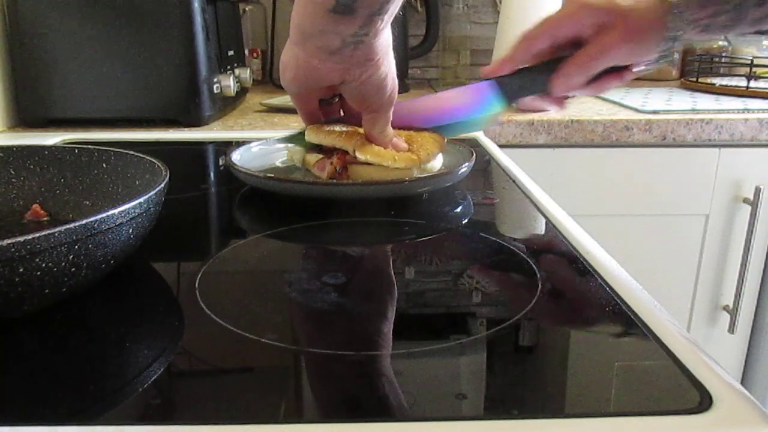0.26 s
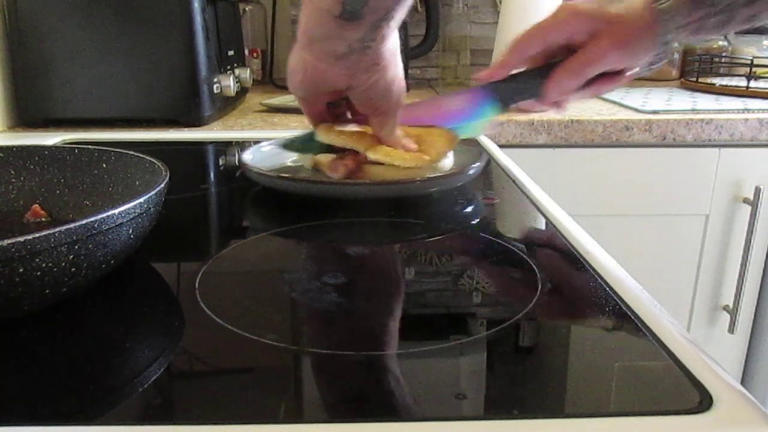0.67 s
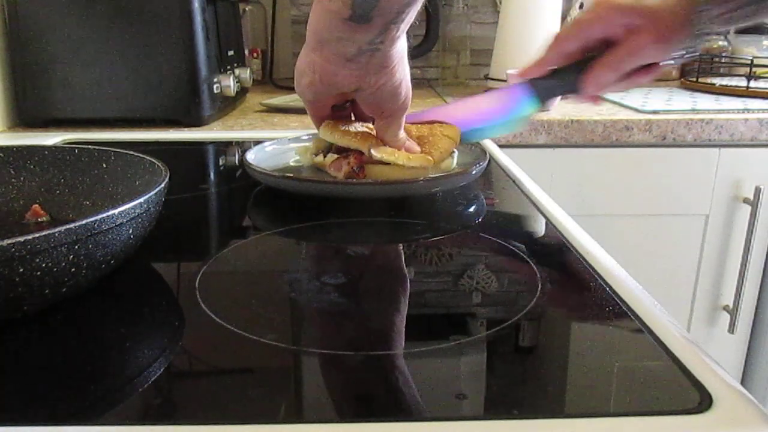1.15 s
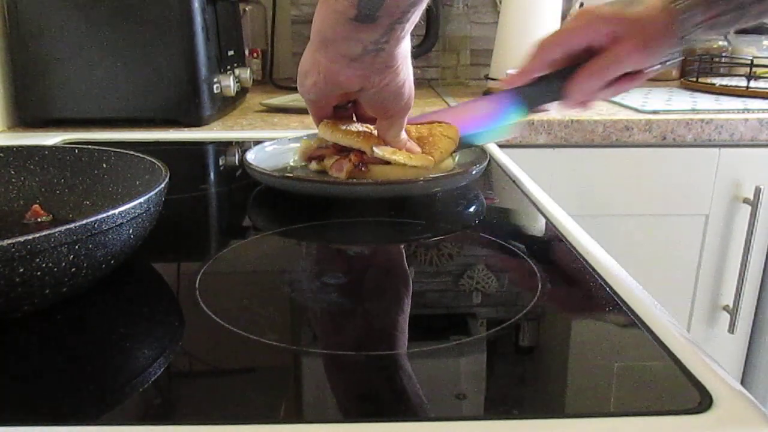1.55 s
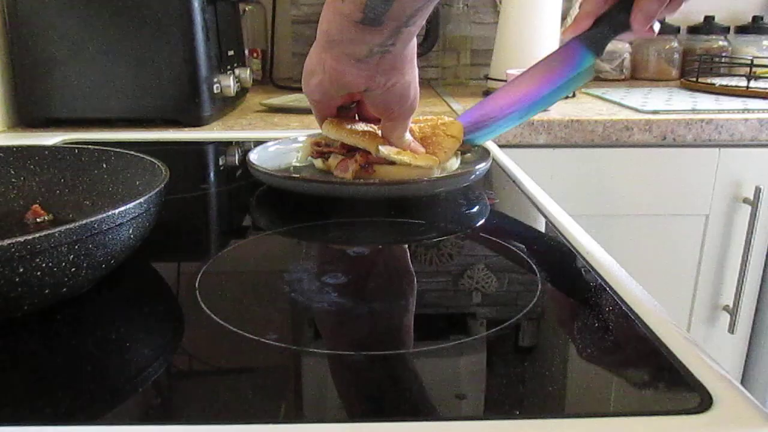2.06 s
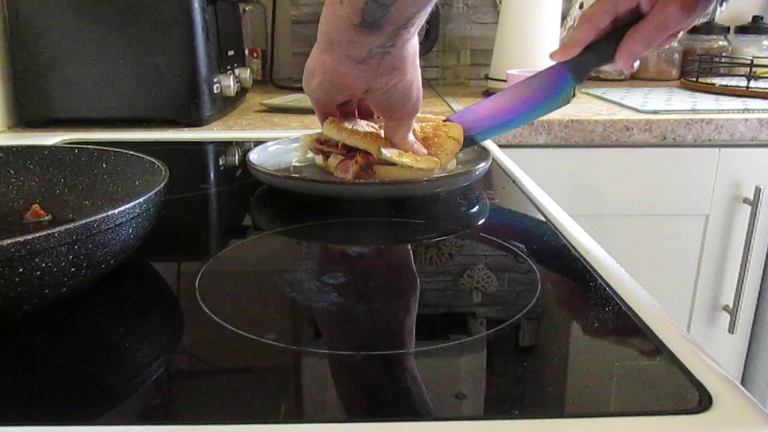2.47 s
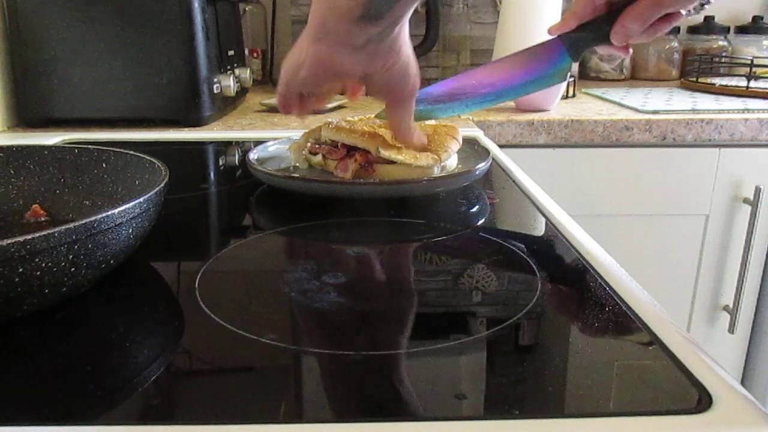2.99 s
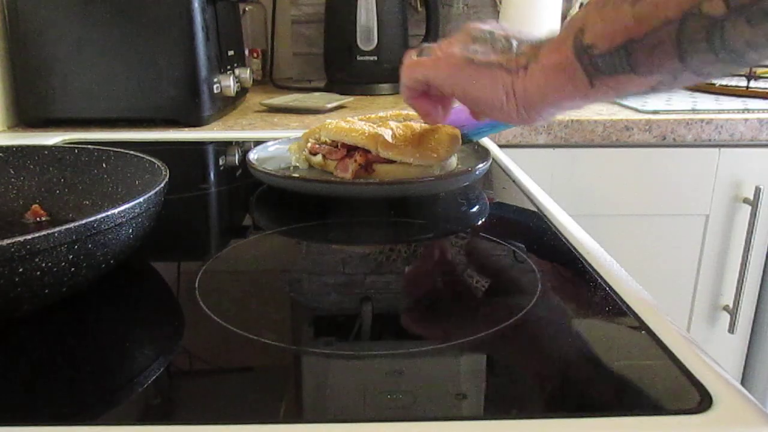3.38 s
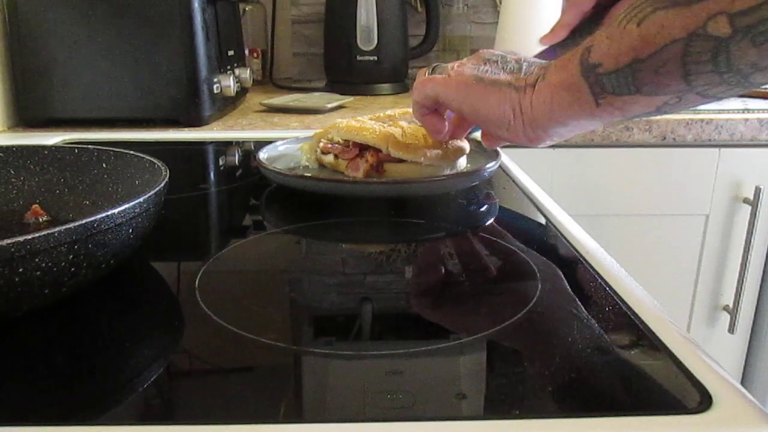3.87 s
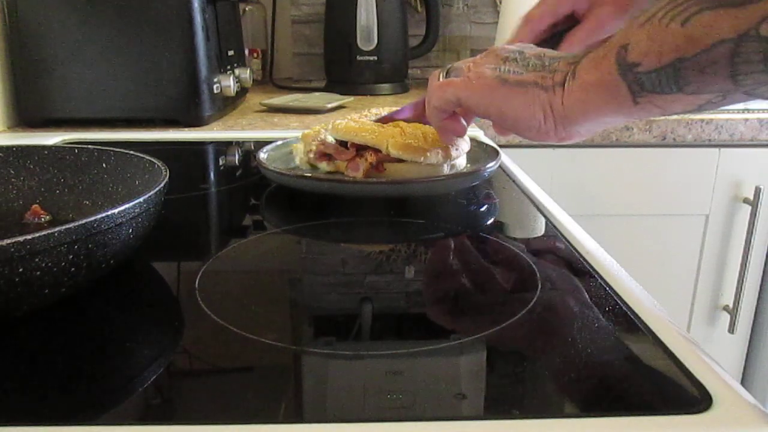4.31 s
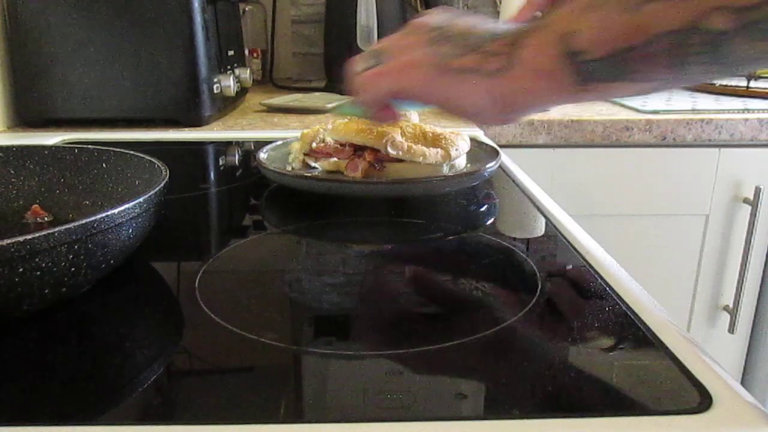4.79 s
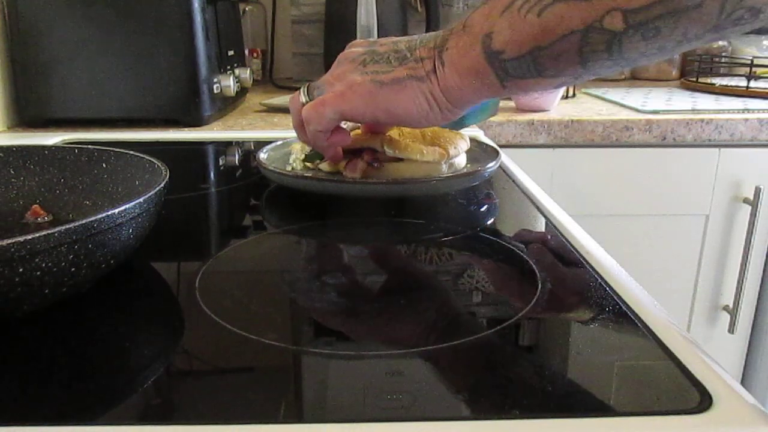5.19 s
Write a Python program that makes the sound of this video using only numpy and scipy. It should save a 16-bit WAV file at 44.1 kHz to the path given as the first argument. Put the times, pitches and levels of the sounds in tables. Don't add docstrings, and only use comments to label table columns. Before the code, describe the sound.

Crisp bread crust crackles under a sawing blade, followed by hard ceramic clacks, a plate rocking, and a final dry tear.

```python
import sys
import numpy as np
from scipy import signal
from scipy.fft import rfft, irfft, next_fast_len
from scipy.io import wavfile
from scipy.ndimage import uniform_filter1d

SR = 44100
rng = np.random.default_rng(int(sys.argv[2]) if len(sys.argv) > 2 else 0)


def invert_db(level):
    return 10 ** (np.asarray(level, dtype=float) / 20)


def unload_wav(signal):
    wavfile.write(
        sys.argv[1],
        SR,
        np.round(np.clip(np.atleast_2d(signal).T, -1, 1) * 32767).astype(np.int16),
    )


N = 240292


def evened(x):
    return x / np.sqrt(np.mean(x ** 2) + 1e-20)


def read(points, hz):
    f, value = np.transpose(points)
    return np.interp(np.log(hz + 1), np.log(f + 1), value)


def add(mix, start_s, sound):
    part = mix[..., round(start_s * SR):][..., :sound.shape[-1]]
    part += sound[..., :part.shape[-1]]


def causal(gain_db):
    log_gain = np.log(invert_db(np.concatenate([gain_db, gain_db[-2:0:-1]])))
    return np.fft.ifft(np.exp(np.conj(signal.hilbert(log_gain)))).real


def colouring(points, size):
    return causal(read(points, np.fft.rfftfreq(size, 1 / SR)))[:size // 2]


def gestures(table, column, edge, rise):
    middle_s, length_s, level_db = np.array(table)[:, [0, 1, column]].T[:, :, None]
    t = np.arange(0, N, 64) / SR
    half_s = 2.6 * length_s * np.where(t < middle_s, rise, 1 - rise) / 2
    arch = np.cos(np.pi / 2 * np.clip((t - middle_s) / half_s, -1, 1)).clip(0) ** edge
    power = ((invert_db(level_db) * arch) ** 2).sum(0)
    return np.interp(np.arange(N) / SR, t, np.sqrt(power))


def grit(per_s, spread_db):
    size = invert_db(spread_db * np.minimum(rng.exponential(1, N), 4))
    return size * rng.choice([-1., 1.], N) * (rng.random(N) < per_s / SR)


def ring(modes, colour_db=0., damping=0.99, swell_ms=0.12, size=SR // 4):
    pitch_hz, width_hz, level_db = np.transpose(modes)[:, :, None]
    t = np.arange(size) / SR
    sign = (-1.) ** np.arange(len(pitch_hz))[:, None]
    decay = np.exp(-np.pi * width_hz * damping * t)
    sines = sign * width_hz * decay * np.sin(2 * np.pi * pitch_hz * t)
    return (invert_db(level_db + colour_db) * sines).sum(0) * (1 - np.exp(-1000 * t / swell_ms))


def leaned(x, lean, lag_s):
    size = next_fast_len(N)
    hz = np.fft.rfftfreq(size, 1 / SR)
    half_db = read(lean, hz) / 2
    ports = np.array([invert_db(half_db) * np.exp(-2j * np.pi * hz * lag_s), invert_db(-half_db)])
    return irfft(rfft(x, size) * ports, size)[:, :N]


# pitch_hz, level_db per Hz
AIR_SPECTRUM = [(12, -46.5), (20, -7), (139, -8.5), (290, -10.5), (333, -14), (508, -8.5), (569, -14),
                (893, -11), (1320, -4.5), (1850, -23.5), (2750, -13.5), (3960, -21.5), (11500, -20.5),
                (13500, -29.5), (15700, -34), (16000, -50), (16600, -55)]
# pitch_hz, width_hz, level_db
CASING = [(687, 72, -5), (912.6, 86, 2), (1410, 104, -7.5), (2280, 150, -15)]
# pitch_hz, likeness (-1 to 1)
AIR_LIKENESS = [(60, 0.082), (180, -0.15), (550, -0.42), (1650, 0.05), (4970, -0.42), (15000, 0.29)]
# pitch_hz, left_minus_right_db
AIR_BALANCE = [(60, -1.0), (180, 0.5), (550, 11.0), (1650, 6.5), (4970, -2.5), (15000, -5.0)]


def air():
    frames, hz = N // 512 + 6, np.fft.rfftfreq(2048, 1 / SR)
    a, b, c, d, patches = rng.standard_normal((frames, 1025, 5)).T
    patches = evened(uniform_filter1d(uniform_filter1d(patches, 20, 0), 8, 1))
    casing = sum(invert_db(2 * level_db) / (1 + (2 * (hz - pitch_hz) / width_hz) ** 2) ** 2
                 for pitch_hz, width_hz, level_db in CASING)
    level = np.sqrt(invert_db(2 * read(AIR_SPECTRUM, hz) - 3.5) + invert_db(-1.0) * casing)
    same = np.clip(read(AIR_LIKENESS, hz), -1, 1)[:, None]
    left = a + 1j * b
    right = same * left + np.sqrt(1 - same ** 2) * (c + 1j * d)
    lean_db = np.outer([.5, -.5], read(AIR_BALANCE, hz))[:, :, None]
    spectra = np.array([left, right]) * level[:, None] * invert_db(lean_db + .8 * patches)
    return invert_db(-49.5) * evened(signal.istft(spectra, nperseg=2048, noverlap=1536)[1][:, :N])


# pitch_hz, level_db
MOTOR_TONES = [(2692, -71), (2795, -69)]


def whine():
    out, sway_db, drift_hz = np.zeros(N), .8, 6
    for pitch_hz, level_db in MOTOR_TONES:
        noises = rng.standard_normal((2, N))
        drift, sway = (evened(uniform_filter1d(uniform_filter1d(v, 900), 900)) for v in noises)
        phase = 2 * np.pi * np.cumsum(pitch_hz + drift_hz * drift) / SR
        out += invert_db(level_db + sway_db * sway) * np.sqrt(2) * np.sin(phase)
    return invert_db(np.array([[1.5], [-1.5]])) * out


# middle_s, length_s, crunch_db, scrape_db
SAW_STROKES = [(0.08, 0.48, -48.5, -61), (0.31, 0.093, -52, -46), (0.45, 0.1, -45, -43.5),
               (0.6, 0.53, -49, -54.5), (0.78, 0.11, -49.5, -47), (0.93, 0.16, -47.5, -48),
               (1.16, 0.12, -45, -44), (1.3, 0.091, -40, -40), (1.43, 0.18, -45, -52),
               (1.57, 0.1, -38.5, -38.5), (1.83, 0.32, -82, -50.5), (1.97, 0.17, -56, -48.5),
               (2.13, 0.11, -62, -55.5), (2.32, 0.14, -56, -50.5), (2.5, 0.17, -59, -49),
               (2.552, 0.092, -42, -38), (2.622, 0.044, -48, -41.5), (2.76, 0.091, -53.5, -52),
               (2.96, 0.18, -58, -67), (3.92, 0.57, -58.5, -68), (4.1, 0.094, -77, -64),
               (4.5, 0.63, -61.5, -60), (4.85, 1, -57.5, -82), (5.15, 0.44, -59.5, -76),
               (5.38, 0.43, -56.5, -65)]
# pitch_hz, level_db per Hz
CRUST_SPECTRUM = [(590, -33.5), (1000, 0), (1120, -52.5), (1420, -7.5), (1840, -8.5), (3900, -9.5),
                  (7700, -11), (8550, -8), (10100, -8), (12500, -17.5), (14800, -19), (15700, -28),
                  (16500, -21.5)]


def crumb_crunch():
    crunch = signal.oaconvolve(grit(2500, 3.3), colouring(CRUST_SPECTRUM, 512))[:N]
    swell = gestures(SAW_STROKES, column=2, edge=1.44, rise=0.5)
    return invert_db(np.array([[-8.], [-1.5]])) * swell * evened(crunch)


# pitch_hz, width_hz, level_db
SCRAPED_PLATE = [(1343, 97, 3.5), (1966, 165, 2), (2393, 450, -3), (3393, 150, -1), (4130, 130, -5.5),
                 (5030, 130, -11), (5780, 140, -10), (6500, 120, -12), (7500, 100, -20.5),
                 (8100, 160, -16.5), (9500, 120, -14), (10600, 130, -11.5), (11750, 160, -26),
                 (13050, 200, -14)]


def blade_scrape():
    scrape = signal.oaconvolve(grit(900, 3.5), ring(SCRAPED_PLATE))[:N]
    return invert_db(-6.0) * gestures(SAW_STROKES, column=3, edge=1.44, rise=0.5) * evened(scrape)


# fullest_s, length_s, glass_rumble_db, worktop_rumble_db
HAND_PRESSES = [(0.53, 0.41, -54, -60.5), (0.7, 0.38, -55, -79), (0.98, 0.34, -53.5, -83),
                (1.35, 0.92, -49.5, -72), (1.7, 0.085, -39.5, -47), (1.88, 0.47, -50, -61),
                (2.31, 0.25, -48.5, -66), (2.55, 0.43, -56.5, -63.5), (2.79, 0.45, -61, -73),
                (3.66, 0.12, -33.5, -49), (3.82, 0.37, -53, -54.5), (4.04, 0.078, -72, -61),
                (4.69, 0.15, -53.5, -56), (4.84, 0.66, -73, -58), (5.2, 0.24, -54.5, -56.5),
                (5.27, 0.11, -55, -56)]
# pitch_hz, width_hz, level_db under the blade, level_db when rocking
GLASS_MODES = [(166.3, 19, -6, -7.5), (208.5, 5.1, -1, -3), (234.5, 12.1, 1, 1), (312.7, 7.2, -4.5, -7.5),
               (359.6, 24.5, -5.5, -3.5), (404.6, 34, -6, -0.5), (447, 23.7, 0, 0.5), (505.5, 30, -2, -2.5),
               (562, 40, -3.5, -2.5), (680.5, 55, -12.5, -11.5)]
GLASS_HELD = np.array(GLASS_MODES)[:, [0, 1, 2]]
GLASS_ROCKING = np.array(GLASS_MODES)[:, [0, 1, 3]]
# pitch_hz, width_hz, level_db
WORKTOP_MODES = [(83, 14, -15.5), (100.8, 8.1, 1), (125, 17.4, -14.5), (236, 21, -7.5), (546, 35, -11.5)]


def hand_pressure():
    darker_db = np.linspace(6., -8., len(GLASS_HELD))[:, None]
    rumble = signal.oaconvolve(grit(500, 1.64), ring(GLASS_HELD, darker_db, 1.26))[:N]
    deep = signal.oaconvolve(grit(600, 1.1), ring(WORKTOP_MODES))[:N]
    on_glass = gestures(HAND_PRESSES, column=2, edge=1.75, rise=0.36) * evened(rumble)
    on_worktop = gestures(HAND_PRESSES, column=3, edge=1.75, rise=0.36) * evened(deep)
    return invert_db(-3.5) * (on_glass + on_worktop)


# pitch_hz, width_hz, level_db
MIC_CAVITIES = [(13250, 350, 7), (15050, 450, 12)]


def crust_cracks(table, dull_db):
    out, hz = np.zeros((2, N)), np.fft.rfftfreq(512, 1 / SR)
    cavity_db = sum(level_db / (1 + (2 * (hz - pitch_hz) / width_hz) ** 2)
                    for pitch_hz, width_hz, level_db in MIC_CAVITIES)
    t_ms = np.arange(600) * 1000 / SR
    opening = 1 - np.exp(-t_ms / 0.2)
    for start_s, peak_db, bright_db, pan_db, burst_ms in table:
        hit, size, sign = rng.random((3, 600))
        volley = (hit < .2) * size ** 2 * np.sign(sign - .5)
        volley *= opening * np.exp(-t_ms / np.clip(burst_ms, .3, 12))
        volley[0] = .65
        tilt = [(2500, dull_db - 5.5), (4500, dull_db), (9200.5 + 30.0 * bright_db, 0), (14500, bright_db + 11.5)]
        crack = np.convolve(volley, causal(read(CRUST_SPECTRUM, hz) + read(tilt, hz) + cavity_db)[:256])
        sides_db = peak_db + np.array([[pan_db], [-pan_db]]) / 2
        add(out, start_s, invert_db(sides_db) * crack / abs(crack).max())
    return out


# start_s, peak_db, brightness_db, left_minus_right_db, burst_ms
CRUST_SNAPS = [(0.1196, -42, 1, -8, 3), (0.135, -20, 8, -17, 1.4), (0.1474, -28, -17.5, -18, 2.5),
               (0.1525, -32, -4, -13, 2.3), (0.17, -36, -3, -13, 2.7), (0.1732, -36, -12, -29, 4.1),
               (0.394, -33, -12, -12, 2), (0.437, -31, -17, -5, 2.2), (0.5277, -34.5, -15, -17, 3.3),
               (0.535, -35, -25, -15, 4), (0.5445, -32.5, -12, -23, 2), (0.562, -27, -6, -11.5, 2),
               (0.568, -24, 0, -15, 2.2), (0.572, -20.5, -9, -14, 2.9), (0.576, -24, -5.5, -16, 2.5),
               (0.58, -22, -3, -8, 2.5), (0.586, -34, -10, -12, 2), (0.598, -23, -21, -9, 0.9),
               (0.615, -21, -35, 2, 2.3), (0.824, -39, -26, 3, 1.2), (0.845, -35, -16, -6, 1.4),
               (0.9838, -25, -6, -18, 4.1), (0.9898, -22.5, -12.5, -18, 4.6), (0.9955, -25, -14, -15, 2.5),
               (1.007, -30, -34.5, -13, 3), (1.1615, -26, -22, -11, 0.65), (1.2365, -24, -56, -1, 2.7),
               (1.255, -31.5, -15, -19, 3.5), (1.2708, -22, -6, -16.5, 2.5), (1.2986, -31, -10, -20.5, 3),
               (1.394, -19, -1, -24.5, 2.3), (1.4036, -18, -22, -5, 5.2), (1.462, -31, -8, -22, 2.3),
               (1.493, -35.5, -19, -18.5, 2.6)]


def crust_snaps():
    return crust_cracks(CRUST_SNAPS, dull_db=-12.5)


# pitch_hz, level_db per Hz
CONTACT_CRACK = [(120, -39), (200, 15.5), (800, 7.5), (1320, -9.5), (1780, 4), (3150, 0), (3620, 23.5),
                 (4150, 2), (8510, -5.5), (14000, -19)]
# pitch_hz, level_db per Hz
RATTLE_SPECTRUM = [(200, -19.5), (800, -4.5), (1500, 0.5), (3000, -2.5), (4500, -8), (6500, -16),
                   (9000, -15.5), (14000, -47)]


def knocks(table, modes, glass_modes, crack_db, spray_db):
    out, pitch_hz = np.zeros(N), modes[:, :1]
    usual_db = read([(1200, -17.0), (2500, -3.5), (7000, -28.0)], pitch_hz) + 20 * np.log10(abs(ring(modes)).max())
    crack = colouring(CONTACT_CRACK, 1024)
    crack = crack / abs(crack).max()
    rattle_filter = colouring(RATTLE_SPECTRUM, 512)
    rattle_fade = np.exp(-np.arange(3000) * 1000 / (SR * 15.5))
    for start_s, peak_db, thud_db, high_db, damping in table:
        rattle = signal.oaconvolve(rng.standard_normal(3000), rattle_filter)[:3000]
        add(out, start_s, invert_db(peak_db + spray_db) * evened(rattle) * rattle_fade)

        contact = rng.standard_normal(260) * (rng.random(260) < .04)
        contact *= 0.25 * np.exp(-np.arange(260) / 120)
        contact[0] = 1
        plate_spot_db = 1.2 * rng.standard_normal((len(modes), 1))
        glass_spot_db = 1.2 * rng.standard_normal((len(glass_modes), 1))

        colour_db = read([(1200, -2 + 0.6 * thud_db), (2500, 0), (7000, high_db)], pitch_hz) - usual_db
        plate = ring(modes, colour_db + plate_spot_db, np.clip(damping, .3, 8) * 1.5, swell_ms=0.15, size=SR // 7)
        plate[:512] += invert_db(crack_db + np.log2(damping)) * crack
        glass = ring(glass_modes, glass_spot_db, 1.4, swell_ms=1.7)
        add(out, start_s, invert_db(peak_db - 3.0) * signal.oaconvolve(plate, contact / np.linalg.norm(contact)))
        add(out, start_s, invert_db(peak_db + thud_db - 2.5) * glass / abs(glass).max())
    return out


# start_s, peak_db, glass_thud_db, high_ring_db, hand_damping (factor)
BLADE_KNOCKS = [(0.4295, -50, -14, -24, 1.6), (0.6663, -38, -16, -32, 1.2), (1.5297, -36, -28, -54, 0.46),
                (1.2715, -28.5, -35.5, -10, 2.7), (1.309, -40, -17, -28, 0.99),
                (1.6048, -3, -15, -13, 1.42), (1.6079, -5.5, -12, -7, 2.4), (1.6265, -10, -7, -1.5, 1.9),
                (1.6405, -28, 6, -10, 1.8), (1.6466, -4.5, -17, -8.5, 1.7), (1.659, -14.5, -17, -27, 1.8),
                (1.672, -29, 9, -13, 2.4), (1.699, -34, 8.5, -20, 3.9), (1.722, -37, 7.5, -20, 4.3),
                (1.757, -40, 4, -23, 2.2), (2.523, -39, -40, 4, 1.06), (2.62, -44, -27, -7, 4),
                (2.626, -37, -20, -8, 4.4), (2.9415, -37.5, -24, -8, 2.5), (4.1152, -38, -40, -3, 4)]
# pitch_hz, width_hz, level_db under the blade, level_db when rocking
PLATE_MODES = [(1008, 13.6, 3.5, 0.5), (1133, 46, 11.5, -9.5), (1218, 23, 9, -3.5), (1332, 24, 9.5, -3),
               (1510, 21, 8, -11.5), (1670, 66, 0, -4), (2170, 650, 6.5, -10), (2151, 54, 10.5, 10.5),
               (2220, 63, 5.5, 11), (2330, 43, 11, 4), (2458, 24, 10, 7.5), (2720, 220, 5.5, 2.5),
               (2890, 100, 4, -3), (3380, 63, 3.5, -11), (3420, 28, -6, 2), (3498, 79, 12, -12),
               (3599, 103, 15, 0), (3676, 93, 9.5, -19), (3900, 62, -31.5, -25), (4650, 450, -16, -16),
               (5300, 92, -18, -11), (5770, 38, -26.5, -15), (6280, 63, -32, -15), (6630, 13, -13, -8),
               (7530, 70, -32, -16), (8070, 17, -27, -26), (8300, 35, -15, -14), (10220, 128, -20, -15.5),
               (12000, 93, -26.5, -21), (13100, 51, -36.5, -39), (13800, 60, -30, -30)]


def blade_knocks():
    return knocks(BLADE_KNOCKS, np.array(PLATE_MODES)[:, [0, 1, 2]], GLASS_HELD, crack_db=-2.5, spray_db=-20)


# pitch_hz, level_db per Hz
HANDLE_BLOW = [(110, -40), (210, -5), (350, -10.5), (802, -13.5), (1450, -8), (2150, -5.5), (2900, -10),
               (3930, -23), (4690, -10.5), (5900, -27), (9000, -20.5), (11700, -55), (19800, -120)]
# pitch_hz, width_hz, level_db
HANDLE_MODES = [(1280, 130, -3.5), (2020, 180, 0.5), (2356, 200, -3), (3060, 97, -12), (3430, 150, -3.5),
                (4220, 140, -8), (4610, 170, -7)]


def handle():
    out, start_s, level_db = np.zeros(N), 1.3662, -13.5
    rattle = 0.68 * rng.standard_normal(600) * np.exp(-np.arange(600) / 110)
    rattle[0] = .6
    t_ms = np.arange(3000) * 1000 / SR
    shake = evened(rng.standard_normal(3000) * (rng.random(3000) < .2)) * np.exp(-t_ms / 18)
    rattle = np.pad(rattle, (0, 2400)) + invert_db(-20) * shake
    blow = np.convolve(rattle, colouring(HANDLE_BLOW, 1024))
    colour_db = read([(1300, 5.5), (2100, 0.5), (3500, 1.5)], np.array(HANDLE_MODES)[:, :1])
    body = ring(HANDLE_MODES, colour_db, damping=1.2, swell_ms=0.64)
    add(out, start_s, invert_db(level_db + 3) * body / abs(body).max())
    add(out, start_s, invert_db(level_db) * blow / abs(blow).max())
    return out


# start_s, peak_db, brightness_db, left_minus_right_db, burst_ms
LOOSE_FLAKES = [(1.8214, -37, -12.5, -35, 1.9), (2.131, -38, -9, -26, 1.2), (2.338, -39.5, -8, -20, 2.7),
                (2.404, -41, -10, -10, 1.2), (2.5965, -41, -1, -8, 2.5), (2.7403, -17, -14.5, -3, 0.52),
                (2.913, -46, -10, -10, 1.3), (3.2754, -39.5, -11, -17, 4), (3.797, -32, -16, -10, 1.8),
                (4.3862, -42, -15, -13, 2.8), (4.8478, -29.5, -26, 1, 3), (5.002, -26, -14, -10, 7.6),
                (5.2737, -36.5, -3, -23, 2.5)]


def crust_flakes():
    return crust_cracks(LOOSE_FLAKES, dull_db=-9.5)


# start_s, peak_db, glass_thud_db, high_ring_db, hand_damping (factor)
PLATE_ROCKS = [
    (1.9415, -38, -5, -34, 1.6),
    (1.951, -32.5, -11, -34, 2),
    (1.97, -52, -11, -28, 2),
    (3.6423, -28, -12, -10, 1.9),
    (3.6605, -12, -2, -16, 1.18),
    (3.669, -18.5, -9, -22, 1.9),
    (3.68, -17.5, -0.5, -15.5, 1.9),
    (3.707, -32.5, 12, -18, 2.7),
    (4.0325, -47, 10, -29, 1.5),
    (4.0873, -44.5, 1, -33, 1.36),
]


def plate_rocks():
    return knocks(PLATE_ROCKS, np.array(PLATE_MODES)[:, [0, 1, 3]], GLASS_ROCKING, crack_db=-27, spray_db=-14)


# start_s, peak_db, glass_thud_db, high_ring_db, hand_damping (factor)
GLAZE_SLIPS = [(2.5345, -34.5, -22, -5, 0.52), (2.547, -40, -40, -6, 0.7), (2.559, -41, -40, -7, 0.84),
               (2.572, -38, -40, -10, 0.59), (2.58, -40, -40, -12, 0.82), (2.7403, -33, -11, 0, 2.2),
               (2.9405, -44.5, -28, 0, 3.1)]


def glaze_slips():
    return knocks(GLAZE_SLIPS, np.array(SCRAPED_PLATE), GLASS_HELD, crack_db=-23, spray_db=-22)


# start_s, peak_db, glass_thud_db, high_ring_db, hand_damping (factor)
PLATE_TIPS = [
    (3.455, -20, -8.5, -33, 1.55),
    (3.5016, -13.5, -11, -22, 1.53),
    (3.5125, -25.5, 1.5, -24, 1.5),
    (3.5322, -21, -7, -25, 1.43),
    (3.56, -37.5, 6, -27, 1.1),
    (3.607, -39, 4.5, -24, 1.8),
]
# pitch_hz, width_hz, level_db
TIPPED_PLATE = [(984, 50, -6), (1230, 29, -1.5), (1600, 60, -10.5), (2133, 46, 3), (2270, 105, 1.5),
                (2516, 48, -0.5), (2900, 120, -12), (3420, 90, 4), (3584, 70, 0), (4520, 340, -10.5),
                (6680, 25, -11), (8420, 40, -8.5), (10270, 130, -21.5), (11900, 90, -22)]


def plate_tips():
    return knocks(PLATE_TIPS, np.array(TIPPED_PLATE), GLASS_ROCKING, crack_db=-12, spray_db=-22)


# start_s, peak_db, glass_thud_db, high_ring_db, hand_damping (factor)
RIM_SLAPS = [
    (3.7175, -4.5, -22, -17.5, 0.74),
    (3.7322, -22.5, -5.5, -33, 0.58),
    (3.778, -45, 16.5, -30, 1),
]
# pitch_hz, width_hz, level_db
BLADE_MODES = [(1327, 69, 10.5), (1550, 90, -2), (2110, 210, -0.5), (2300, 120, -4), (2650, 210, -1),
               (3100, 240, 3), (3540, 180, 5), (3686, 200, 3), (4600, 560, -22), (5370, 410, -17),
               (6330, 420, -27), (8200, 810, -14.5)]


def rim_slaps():
    return knocks(RIM_SLAPS, np.array(BLADE_MODES), GLASS_HELD, crack_db=-0.5, spray_db=-23.5)


# start_s, peak_db, brightness_db, left_minus_right_db, burst_ms
LAST_TEAR = [
    (5.3428, -14.5, -4, -16.5, 1.8),
    (5.3462, -19, -7.5, -25.5, 1.9),
    (5.3502, -16.5, -5, -4, 6.4),
    (5.3776, -28, -22, -10, 2.6),
]


def crust_tear():
    return crust_cracks(LAST_TEAR, dull_db=-14)


# pitch_hz, likeness (0 to 1)
ECHO_LIKENESS = [(60, 0.35), (250, 0.85), (1000, 0.27), (2500, 0.039), (6000, 0.04), (14000, 0.47)]
# pitch_hz, t60_s
KITCHEN_DECAY = [(55, 0.49), (120, 0.4), (330, 0.49), (870, 0.42), (2300, 0.43), (3600, 0.28), (5000, 0.42),
                 (14000, 0.31)]


def room_tail(gap_ms):
    taps, start = np.zeros((2, SR * 2 // 3)), round(gap_ms * SR / 1000)
    slots = np.arange(start, taps.shape[1] - 20, 20)
    at = slots + rng.integers(0, 20, (2, len(slots)))
    np.put_along_axis(taps, at, rng.choice([-1., 1.], at.shape), 1)
    hz, t, z = signal.stft(taps, SR, nperseg=256)
    same = np.clip(read(ECHO_LIKENESS, hz), 0, 1)[:, None]
    z[1] = same * z[0] + np.sqrt(1 - same ** 2) * z[1]
    fade = invert_db(-60 * t / read(KITCHEN_DECAY, hz)[:, None])
    tail = signal.istft(z * fade, SR, nperseg=256)[1]
    tail[:, :start] = 0
    tail *= 1 + 1.28 * np.exp(-np.arange(tail.shape[1]) / (0.023 * SR))
    return tail / np.linalg.norm(tail[0])


def kitchen(x, gap_ms):
    turn = 2 * np.pi * 2.3 * np.arange(N) / SR
    return sum(signal.oaconvolve((x * weight)[None], room_tail(gap_ms), axes=1)[:, :N]
               for weight in (np.cos(turn), np.sin(turn)))


# pitch_hz, left_minus_right_db
PLATE_BALANCE = [(60, 2.5), (150, 5), (380, 2), (950, 0), (2380, -7), (6000, -8), (15000, -8)]


def scene():
    bread = crumb_crunch() + crust_snaps() + crust_flakes() + crust_tear()
    table = blade_scrape() + hand_pressure() + blade_knocks() + handle()
    table = table + plate_rocks() + glaze_slips() + plate_tips() + rim_slaps()
    no_deep_bass = signal.butter(2, 70, "high", fs=SR, output="sos")
    table = signal.sosfilt(no_deep_bass, table)
    echo = kitchen(invert_db(-2.0) * (table + bread.mean(0)), gap_ms=3.5)
    near_table = leaned(table + echo, PLATE_BALANCE, lag_s=-0.000025)
    near_bread = leaned(bread, [(60, 0), (15000, 0)], lag_s=3e-5)
    return near_table + near_bread + air() + whine()


def roll_off(x):
    return signal.sosfilt(signal.butter(12, 16800, fs=SR, output="sos"), x)


def record(dry):
    bass_cut = signal.butter(1, 30, "high", fs=SR, output="sos")
    top_cut = signal.firwin(255, 16100, fs=SR)[None]
    soft = signal.sosfilt(bass_cut, .9 * np.tanh(dry / .9))
    mix = signal.oaconvolve(soft, top_cut, "same")
    return roll_off(mix)


dry = scene()
out = record(dry)
unload_wav(out)
```